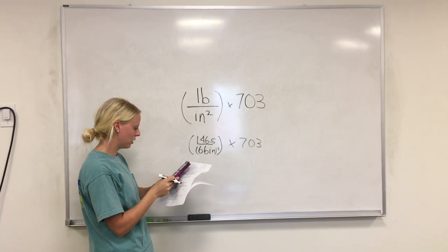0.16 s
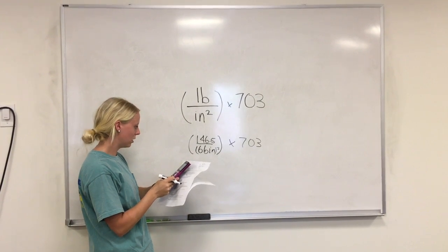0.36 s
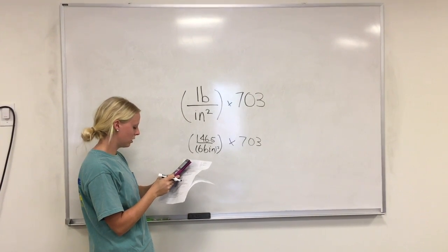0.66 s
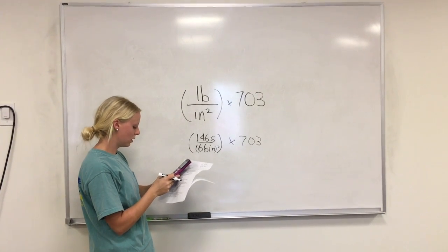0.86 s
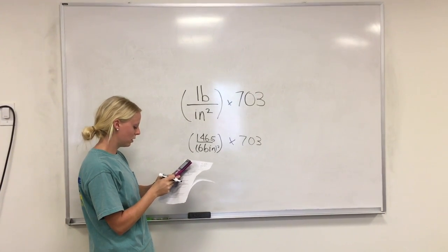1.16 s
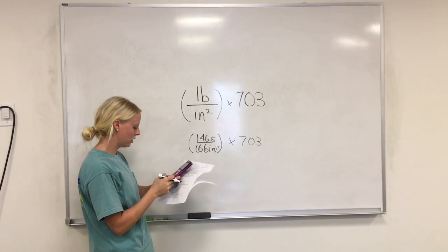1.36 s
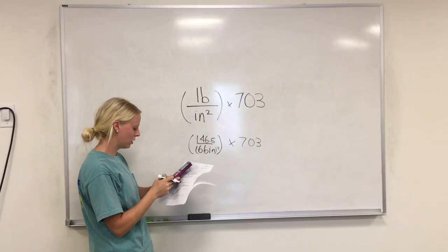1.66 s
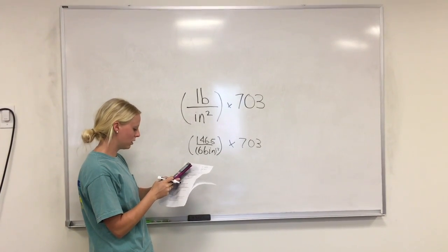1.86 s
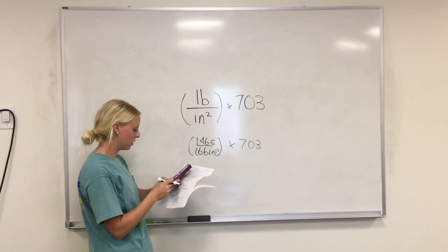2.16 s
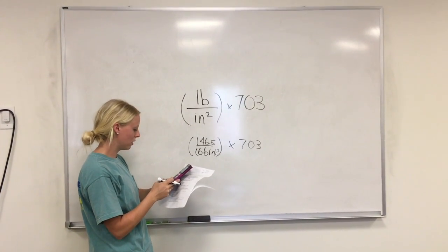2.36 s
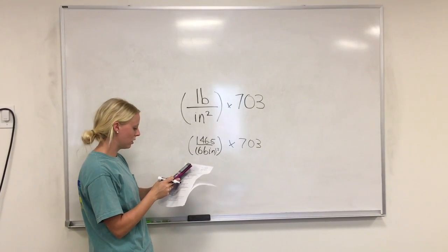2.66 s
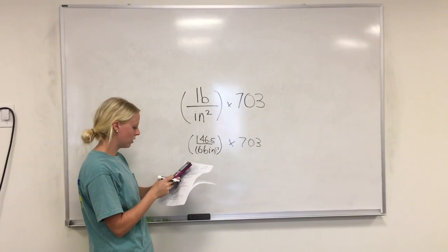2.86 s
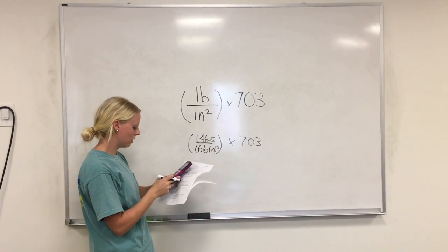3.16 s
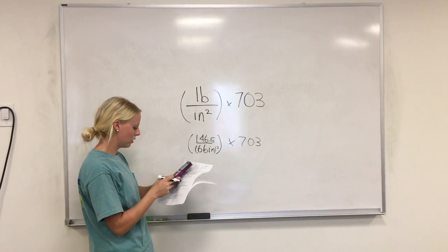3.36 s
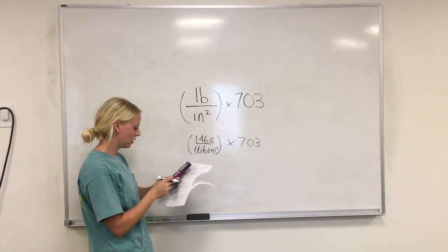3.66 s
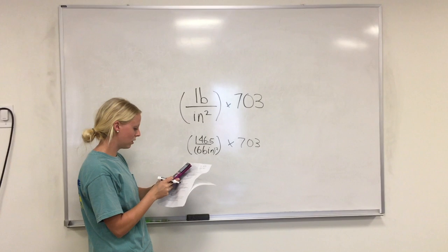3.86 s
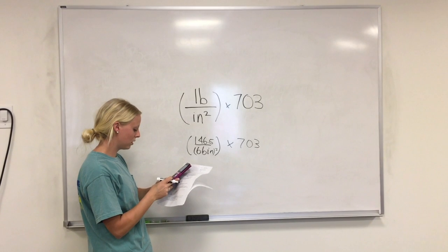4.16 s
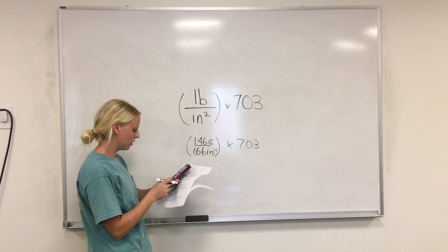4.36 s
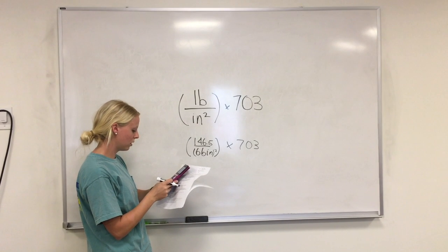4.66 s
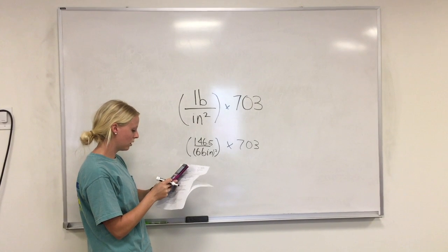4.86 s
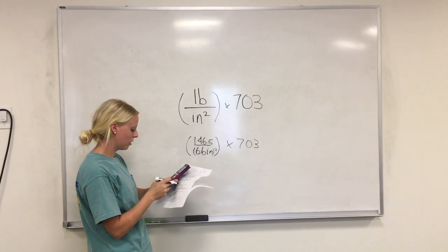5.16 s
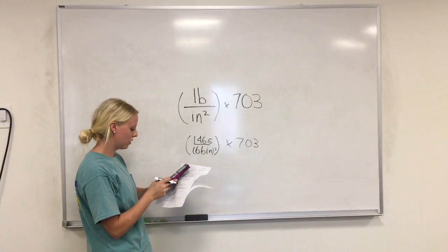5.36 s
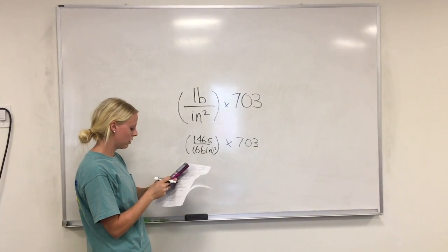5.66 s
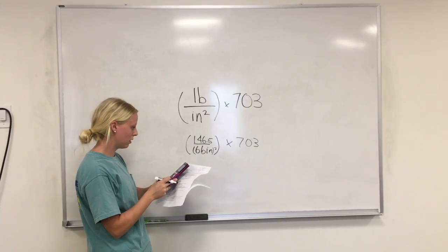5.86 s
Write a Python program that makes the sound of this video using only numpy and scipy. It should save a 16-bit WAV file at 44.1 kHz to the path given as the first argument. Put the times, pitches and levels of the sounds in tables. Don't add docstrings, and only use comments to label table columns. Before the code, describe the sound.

Rapid, even clockwork ticking fills the foreground from start to end, dry and close, alternating between two slightly different colours. Every beat has faint clicks just before its main snap, then a rattly ring that dies within a tenth of a second. Weak, irregular mechanical clicks appear in the gaps. A constant low motor hum and airy rumble stay underneath, with very soft hiss. The room is calm and adds only a faint tail.

```python
import sys
import numpy as np
from scipy import signal
from scipy.fft import rfft, irfft, next_fast_len
from scipy.io import wavfile

SR = 44100
rng = np.random.default_rng(int(sys.argv[2]) if len(sys.argv) > 2 else 0)


def nominal_scale(level):
    x = np.asarray(level, float) / 20
    return 10 ** x


def wav_record(signal):
    frames = np.transpose(np.atleast_2d(signal))
    bounded = np.clip(frames, -1, 1)
    quanta = np.round(bounded * 32767).astype(np.int16)
    wavfile.write(sys.argv[1], SR, quanta)


N = 265282
RING_T = np.arange(SR // 8) / SR

# low f/Hz, high f/Hz, t60/s,
# level over the modes/dB, rise/s, pitch wander of the modes [fraction]
PARTS = [(653, 1213, 0.13, -2, 0.0026, 0.0039), (1280, 2350, 0.088, -3, 0.0014, 0.0015),
         (2270, 4500, 0.094, 2.2, 0.0011, 0.0028), (4380, 20000, 0.065, 1.5, 0.000099, 0.014)]
# drop t/s, drop level/dB, drop brightness/dB, impulse lead/ms, impulse level/dB
BEATS = [(.08, -32.5, 0.5, 17.7, -39.5), (0.3714, -31, 0.5, 18, -35), (0.6802, -34.5, 0.5, 14.7, -38.5),
         (.9713, -29.5, 0.5, 17.7, -36.5), (1.2791, -34.5, -1.5, 13.2, -37.5),
         (1.5696, -28.5, 2, 18.7, -36), (1.8797, -35.5, 1, 13.8, -36.5), (2.1678, -30, -1.5, 15.5, -36),
         (2.4769, -33.5, -1, 13.6, -38), (2.7665, -29.5, -0.5, 15.2, -37), (3.0749, -33, -2, 13, -35.5),
         (3.366, -29.5, 0.5, 16.8, -37), (3.6723, -34.5, 2, 13.6, -40), (3.9651, -29.5, 1, 16.5, -39),
         (4.273, -32, 1, 12.3, -34), (4.5637, -32, -1, 17, -39.5), (4.873, -34.5, 1, 10.4, -38),
         (5.1643, -32, 1, 18, -39.5), (5.4718, -36.5, 1, 12.8, -43), (5.7614, -31.5, -0.5, 18, -38)]


def level(x, db):
    return x * nominal_scale(db) / np.sqrt(np.mean(x ** 2))


def fade(t60):
    return np.exp(np.float32(-np.log(1000) * RING_T / t60))


def band(x, low_hz, high_hz):
    return signal.sosfilt(signal.butter(2, [low_hz, high_hz], "bandpass", fs=SR, output="sos"), x)


def colour(x, points):
    hz, db = np.transpose(points)
    size = next_fast_len(N)
    log_hz = np.log(np.arange(1, size // 2 + 2) * SR / size)
    gain = nominal_scale(np.interp(log_hz, np.log(hz), db))
    return irfft(rfft(x, size) * gain, size)[..., :N]


def hiss():
    # f/Hz, level/dB per Hz
    spectrum = [(13, -57), (22, -29), (49, -1.0), (76, -6.0), (154, -10.5), (315, -15), (475, -26.0),
                (643, -25.5), (893, -25.5), (1500, -35.0), (2530, -40.5), (2910, -42.5), (3330, -43.0),
                (9200, -47), (15500, -52)][:-1]
    # f/Hz, side minus mid level/dB
    spread = [(60, -56), (130, -66), (300, -36), (700, -23.5), (1500, -20.5), (4000, -21), (8000, -31),
              (15000, -20)]
    mid = colour(rng.standard_normal(N), spectrum)
    side = colour(colour(rng.standard_normal(N), spectrum), spread)
    return np.array([mid, side]) * nominal_scale(-52) / np.std(band(mid, 151, 16000))


def ventilation():
    # f/Hz, width/Hz, level/dB
    room_modes = [(58, 13.2, -51), (80.4, 11, -55.5), (114.8, 10, -63)]
    # f/Hz, level/dB rms
    motor_tones = [(58.6, -45.8), (85.3, -52.8), (111, -59.5)]
    t = np.arange(N) / SR
    rumble = sum(level(band(rng.standard_normal(N), f - width / 2, f + width / 2), db)
                 for f, width, db in room_modes)
    hum = sum(level(np.sin(2 * np.pi * (f * t + rng.random())), db) for f, db in motor_tones)
    return (rumble + hum) * np.array([[1], [0]])


def ring(modes, part, contact, chatter, scatter_db, dense_db):
    hz, db, t60 = np.array(modes).T[..., None]
    low_hz, high_hz, dense_t60, part_db, rise_s, wander = part
    chance = rng.standard_normal((2, len(modes), 2))
    mode_hz = hz * (1 + wander * chance[0, :, :1])
    tones = nominal_scale(db) * np.sin(np.float32(2 * np.pi * mode_hz * RING_T)) * fade(t60)
    strengths = nominal_scale(min(scatter_db, 2.2) * chance[1]).T * np.sign(chance[0].T)
    tones = signal.fftconvolve(strengths @ tones, contact[None])[:, :len(RING_T)]
    fall = fade(dense_t60) + nominal_scale(-36.5) * fade(0.48)
    dense = band(rng.standard_normal(tones.shape) * chatter, low_hz, high_hz) * fall
    both = (level(tones, 0) + level(dense, part_db + dense_db)) * (1 - np.exp(-RING_T / rise_s))
    onset_power = np.mean(both[:, :400] ** 2, axis=1, keepdims=True)
    return both / np.sqrt(onset_power)


def blows(table, rattle_s, rattle_db, scatter_db, dense_db, sharp_db, spot_hz, spot_db):
    # f/Hz, level/dB, t60/s
    case_modes = [(577, -35.5, 0.39), (688.4, 3.5, 0.11), (739, 0.5, 0.072), (815, 4.5, 0.053),
                  (867.5, 1, 0.095), (932, -5.5, 0.13), (1027, -7, 0.16), (1208, -12, 0.036)]
    back_modes = [(1373, -5, 0.13), (1524, -3, 0.087), (1624, -1, 0.044), (1790, -4.5, 0.12),
                  (2059.6, 5, 0.062), (2506, -2.5, 0.043)]
    front_modes = [(2700, -8, .06), (2945, -9, .07), (3359, 1.5, .12), (3420, -6, .08), (3585, -2, .1),
                   (3890, -7, .08), (4189, -7.5, .08), (4380, -8, .07), (4614, -6.5, .08), (4840, -8, .07)]
    steel_modes = [(5100, -3, .04), (5850, -2, .035), (6450, -4, .03), (7050, -3, .03), (9300, -6, .02),
                   (10570, -9, .025), (11480, -8, .025), (12450, -3, .022), (12820, -3, .022),
                   (14100, -5, .018), (15100, -8, .018)]
    spot_octaves = .07
    steel = [(hz, db + sharp_db * np.log2(hz / 9000), t60) for hz, db, t60 in steel_modes]
    bodies = []
    for modes in (case_modes, back_modes, front_modes, steel):
        bodies.append([(hz, db + spot_db * np.exp(-(np.log2(hz / spot_hz) / spot_octaves) ** 2), t60)
                       for hz, db, t60 in modes])
    out = np.zeros((2, N + len(RING_T)))
    for s, *part_db in table:
        rattle = rng.standard_normal(SR // 30) ** 3 * fade(rattle_s)[:SR // 30]
        contact = nominal_scale(rattle_db) * rattle
        contact[0] = 1
        grains = np.repeat(rng.standard_normal(len(RING_T) // 40 + 1), 40)
        chatter = nominal_scale(3.2 * grains[:len(RING_T)])
        at = int(s * SR)
        for modes, part, db in zip(bodies, PARTS, part_db):
            out[:, at:at + len(RING_T)] += nominal_scale(db) * ring(modes, part, contact, chatter, scatter_db, dense_db)
    return out[:, :N]


def rows(seconds, db, bright_db, kind_db):
    bright_share = (-0.52, -0.49, 0.86, 1.7)
    strength = np.add.outer(db, np.zeros(len(PARTS)))
    return np.column_stack([seconds, strength + np.outer(bright_db, bright_share) + kind_db])


def light_clicks():
    # t/s, level/dB, brightness/dB
    gears = [(0.1452, -50.5, 1.5), (1.1511, -54.5, -2), (2.039, -55.5, 1.5), (2.06, -62.5, 5),
             (2.3583, -52.5, 0.5), (3.488, -50, -2), (3.7386, -53, -3), (3.8653, -62.5, 0),
             (4.0203, -58.5, -0.5), (4.454, -52.5, 0), (4.6398, -51, -0.5), (5.0296, -56, 2),
             (5.6413, -52, -1.5), (5.8058, -51, 1), (6.0073, -48, -2.5)]
    # t/s, level/dB, brightness/dB
    rebounds = [
        (.980, -45.5, 0),
        (1.003, -58, 4),
        (1.315, -63, 7),
        (2.176, -54, 4.5),
        (2.197, -60, 2),
        (3.931, -57, 0),
        (4.594, -52.5, -0.5),
        (5.770, -46, -0.5),
        (5.792, -61, 4),
    ]
    rebound_db, wheel_db = (6, 1, -8.5, -7.5), (-19, -6, -6, 0.5)
    echo_s, echo_db = .0437, -15
    wheels = rows(*np.transpose(gears), wheel_db)
    answers = wheels + [echo_s, *[echo_db] * len(PARTS)]
    clicks = [*wheels, *rows(*np.transpose(rebounds), rebound_db), *answers[:-1:2]]
    return blows(clicks, rattle_s=0.016, rattle_db=-58, scatter_db=5, dense_db=6, sharp_db=-13.5,
                 spot_hz=2300, spot_db=3)


def sway():
    # f/Hz, level/dB, t60/s
    panel = (456, -64, 0.74)
    hz, db, t60 = panel
    since = np.arange(N) / SR - np.array(BEATS)[:, :1]
    size = nominal_scale(db + 4 * rng.standard_normal((len(BEATS), 1))) * (since > 0)
    decay = np.exp(-np.log(1000) * np.abs(since) / t60)
    return np.sum(size * np.sin(2 * np.pi * hz * since) * decay, axis=0)


def unlocks():
    unlock_db = [(-51, -56, -53, -60.5), (-48, -46, -55, -50.5)]
    touch_db = (-47, -50.5, -68, -58)
    swing_s, tick_s, tock_s, touch_s = .59898, .0383, .3254, 0.011
    swings = swing_s * np.arange(len(BEATS) // 2)
    scatter = 1.5 * rng.standard_normal((6, len(swings)))
    ticks = rows(tick_s + swings, scatter[0], scatter[1], unlock_db[0])
    touches = rows(tick_s + swings + touch_s, scatter[2], scatter[3], touch_db)
    tocks = rows(tock_s + swings, scatter[4], scatter[5], unlock_db[1])
    out = blows(ticks, rattle_s=.04, rattle_db=-38, scatter_db=3, dense_db=0, sharp_db=-6,
                spot_hz=4600, spot_db=20)
    out += blows(touches, rattle_s=.039, rattle_db=-37.5, scatter_db=3.2, dense_db=2, sharp_db=0,
                 spot_hz=2400, spot_db=8)
    out += blows(tocks, rattle_s=.076, rattle_db=-44, scatter_db=3.1, dense_db=0, sharp_db=-11,
                 spot_hz=2120, spot_db=5)
    return out


def impulses():
    impulse_db = [(0, -4, -8.5, -12.5), (0, -9.5, -17.5, -12)]
    drop_s, _, _, lead_ms, push_db = np.transpose(BEATS)
    tock = np.arange(len(BEATS)) % 2
    pushes = rows(drop_s - lead_ms / 1000, push_db, 0 * tock, np.array(impulse_db)[tock])
    return blows(pushes, rattle_s=0.027, rattle_db=-41.5, scatter_db=4, dense_db=0, sharp_db=-5,
                 spot_hz=741, spot_db=12)


def drops():
    kind_db = [(0, 0, -7.5, -13), (0, -1.96, -10.5, -14)]
    drop_s, drop_db, bright_db, _, _ = np.transpose(BEATS)
    tock = np.arange(len(BEATS)) % 2
    falls = rows(drop_s, drop_db, bright_db, np.array(kind_db)[tock])
    return blows(falls, rattle_s=0.021, rattle_db=-35, scatter_db=2.2, dense_db=-3, sharp_db=4.5,
                 spot_hz=3370, spot_db=2.5)


def clock():
    # f/Hz, side minus mid level/dB
    apart = [(300, -16), (450, -15), (540, -9), (700, -32), (950, -13), (1500, -17), (2050, -25.5),
             (2900, -4), (3600, -17), (4700, -10.5), (6300, -12), (8500, -23), (12800, -8.5), (16000, -14)]
    light = light_clicks()
    mid, other = unlocks() + impulses() + drops()
    side = colour(other + nominal_scale(-26) * light[1], apart) + sway()
    return np.array([mid + light[0], side])


def scene():
    mid, side = hiss() + ventilation() + clock()
    return np.array([mid + side, mid - side])


def band_limit(x):
    return signal.sosfilt(signal.butter(12, 16490, fs=SR, output="sos"), x)


def record(dry):
    # f/Hz, level/dB
    microphone = [(8000, 0), (9900, .6), (10300, -2), (11200, -1), (14000, -2.6), (15720, -4.5),
                  (15880, -33), (16450, -39), (16600, -52)]
    return band_limit(colour(dry, microphone))


dry = scene()
out = record(dry)
wav_record(out)
```